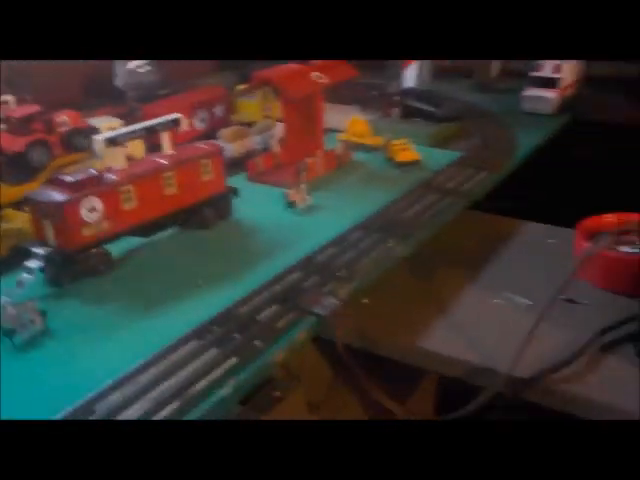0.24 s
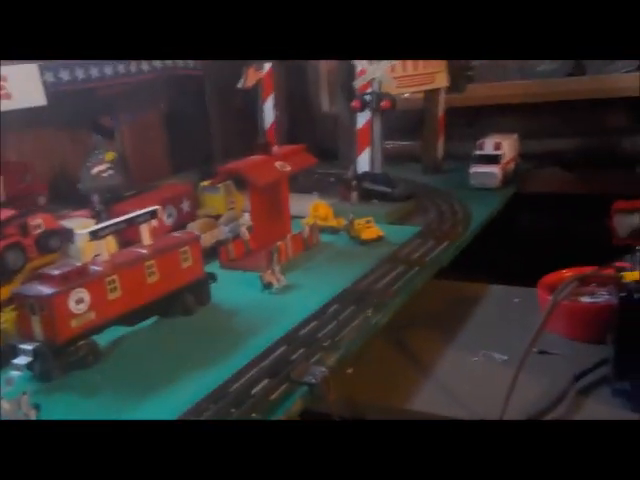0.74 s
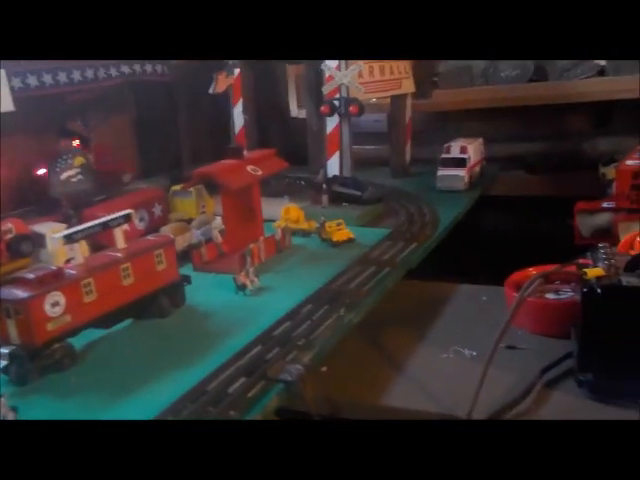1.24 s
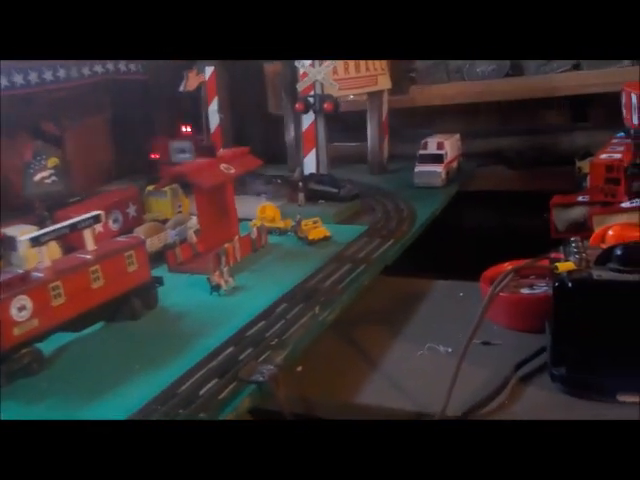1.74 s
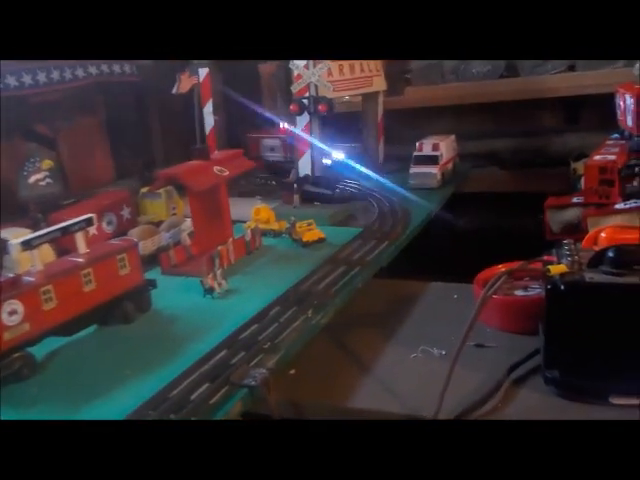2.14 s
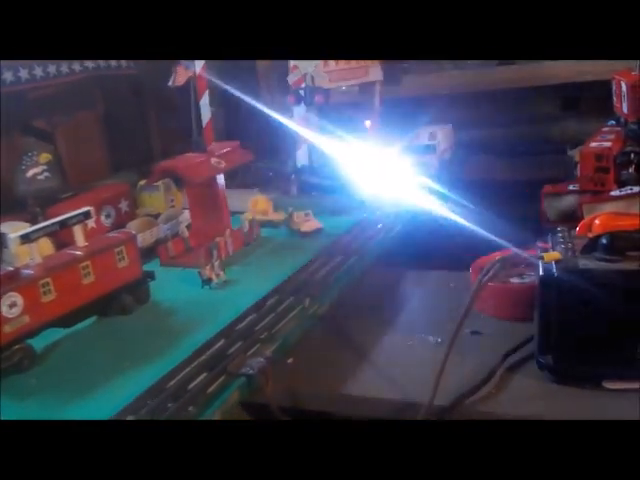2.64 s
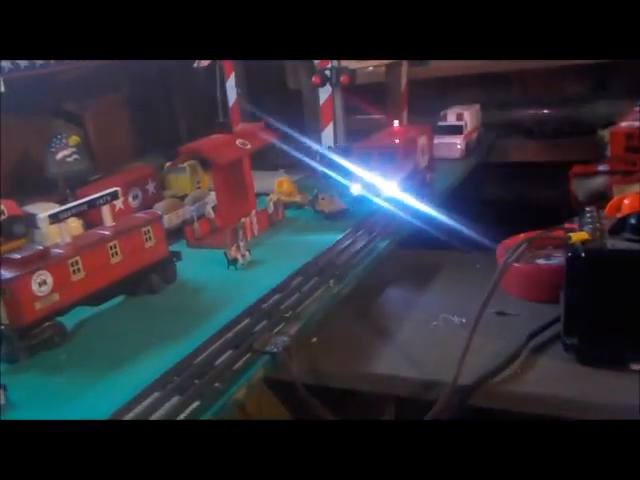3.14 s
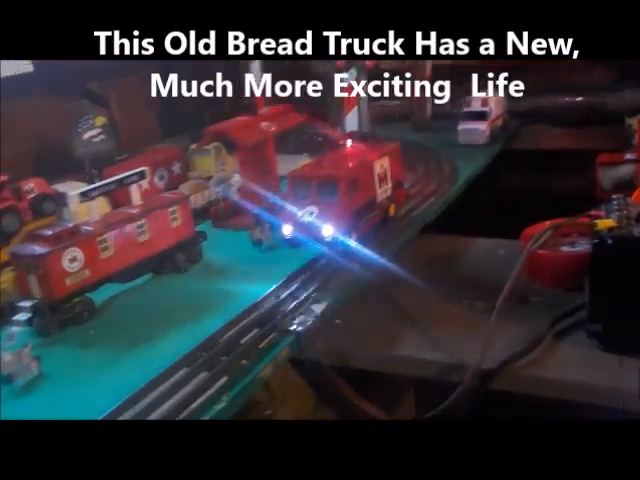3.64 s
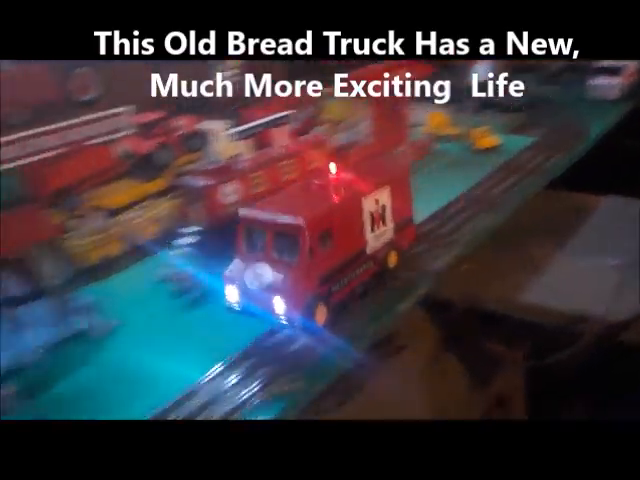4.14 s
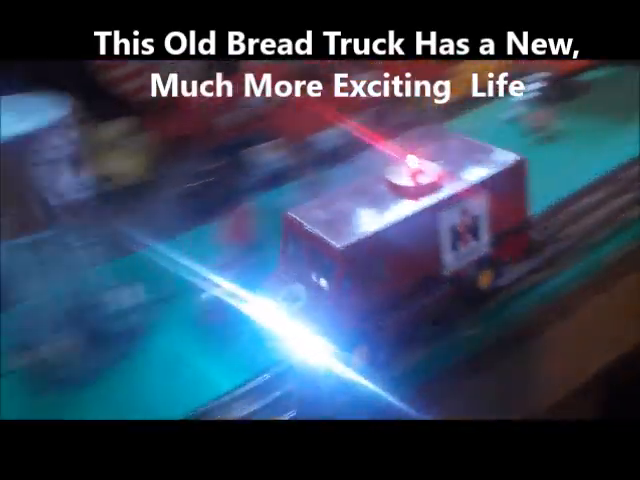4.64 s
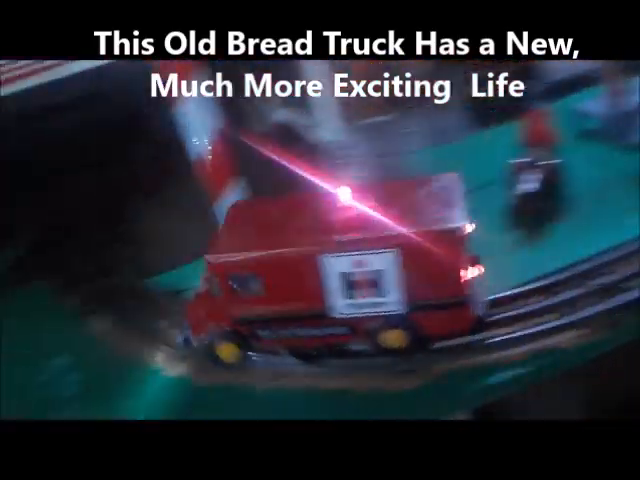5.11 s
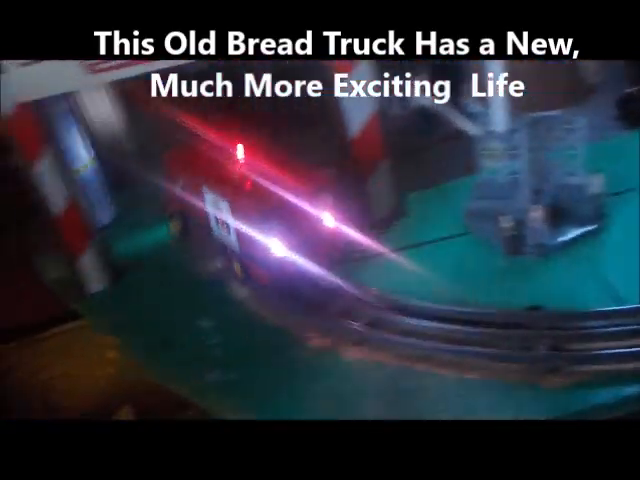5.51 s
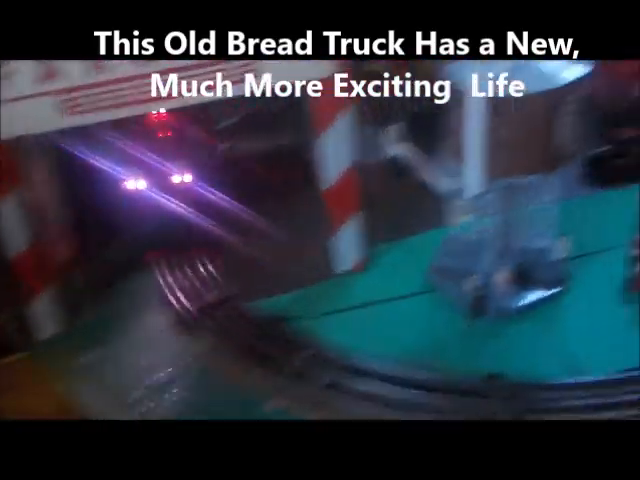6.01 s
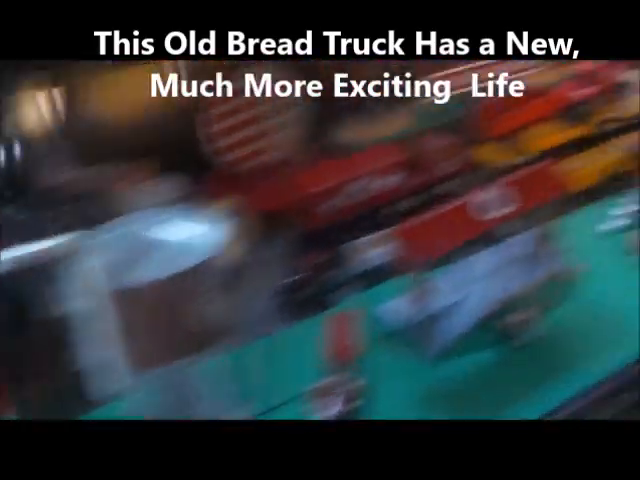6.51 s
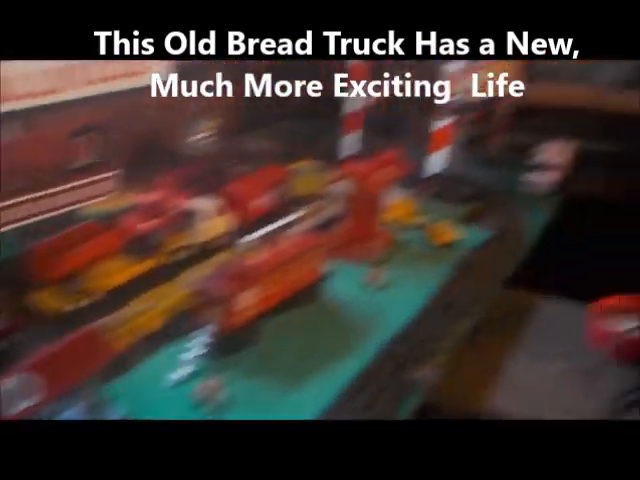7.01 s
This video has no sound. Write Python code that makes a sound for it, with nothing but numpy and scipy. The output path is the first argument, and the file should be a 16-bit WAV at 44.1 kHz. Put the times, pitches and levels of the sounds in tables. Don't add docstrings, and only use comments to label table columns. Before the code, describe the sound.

A toy truck runs round a track on a table, its wheels giving a steady bright rattle over a woody drumming. Paired clacks mark each rail joint, about two a second. It swells as it passes close around the middle, then recedes. Near three seconds the camera's plastic shell creaks loudly, close and to the right. Late on, a finger muffles the right side and a button clicks.

```python
import sys
import numpy as np
from scipy import signal
from scipy.fft import rfft, irfft, next_fast_len
from scipy.io import wavfile
from scipy.ndimage import uniform_filter1d, map_coordinates

SR = 44100
rng = np.random.default_rng(int(sys.argv[2]) if len(sys.argv) > 2 else 0)


def level_to_linear(level):
    exponent = np.asarray(level, float) / 20
    return 10 ** exponent


def store_pcm(level_fs):
    pcm = np.round(np.clip(level_fs, -1, 1) * 32767).astype(np.int16)
    wavfile.write(sys.argv[1], SR, np.atleast_2d(pcm).T)


N = 320166


def unit(x):
    return x / np.sqrt(np.mean(x ** 2) + 1e-20)


def along(points, hz):
    f, v = np.transpose(points)
    return np.interp(np.log(hz + 1), np.log(f + 1), v)


def curves(rows):
    s, *columns = np.transpose(rows)
    return [np.interp(np.arange(N) / SR, s, column) for column in columns]


def wobble(rate):
    knots = rng.standard_normal(int(N * rate / SR) + 4)
    return map_coordinates(knots, [np.arange(N) * rate / SR])


def filtered(x, response):
    m = next_fast_len(N + SR // 2)
    return irfft(rfft(x, m) * response(np.fft.rfftfreq(m, 1 / SR)), m)[..., :N]


def onset(t, rise_s):
    return 1 - np.exp(-t / rise_s)


def pan(db):
    return level_to_linear([[db / 2], [-db / 2]])


def place(out, s, sound):
    start = round(s * SR)
    out[..., start:start + sound.shape[-1]] += sound


def ring(modes, t, scatter_db):
    total = 0
    for hz, db, t60 in modes:
        decay = level_to_linear(db + scatter_db * rng.normal() - 60 * t / t60)
        total = total + decay * np.sin(2 * np.pi * hz * t)
    return total


# time in seconds, nearness as wheel rattle in dB, open line of sight in dB.
ROLL = [(0.0, -36, 4), (0.16, -32.5, -2), (0.6, -33.5, -8), (0.8, -35, -3), (1.5, -34.5, -1),
        (1.72, -32.5, 0), (2.14, -32.5, 5.5), (2.75, -32.5, -2.5), (3.09, -36, 1), (3.35, -41, 7),
        (3.84, -35, 12.5), (4.25, -30, 6.5), (4.85, -29.5, 5), (5.05, -26, 3.5), (5.74, -33.5, 2),
        (6.4, -34.5, 7), (6.67, -38.5, 7), (6.9, -36, 7)]
# frequency in Hz, density in dB per Hz.
TABLE_COLOUR = [(20, -70), (60, -42), (130, -69), (250, -28), (490, -11), (900, -1), (1400, 0),
                (1950, -0.5), (2300, -3.5), (2700, -20), (4000, -120)]
WHEEL_COLOUR = [(1500, -120), (2200, -37), (2750, -6), (3000, -14.5), (3190, -2), (3300, 3), (3510, 4),
                (3740, 0.5), (5150, -8.5), (7000, -23), (9100, -43.5), (15400, -120)]
SIZZLE_COLOUR = [(5000, -14), (6500, 0.5), (7600, -9), (8500, -10), (10000, -21), (12000, -37),
                 (15800, -41)]


def truck():
    wheel_db, sight_db = curves(ROLL)
    table_db = -38 + 0.48 * (wheel_db + 37.5)
    sizzle_db = wheel_db - 29 + sight_db
    clack, knock = rail_blows()
    zing = clack * level_to_linear(-35.5 + 0.72 * sight_db)
    shake = wobble(14)
    table = np.hypot(level_to_linear(table_db + 0.45 * shake + 0.17 * wobble(0.8)), level_to_linear(-11.5) * knock)
    wheels = np.hypot(level_to_linear(wheel_db + 1.0 * shake + 0.73 * wobble(30)), level_to_linear(-8) * clack)
    sizzle = np.hypot(level_to_linear(sizzle_db + 2.0 * shake), level_to_linear(7.0) * zing)
    sound = table * rattle(TABLE_COLOUR, knocks_db=2.5, patchy_db=1.2, ripple_db=2.3)
    sound += wheels * rattle(WHEEL_COLOUR, knocks_db=1.0, patchy_db=0.8, ripple_db=3.0)
    sound += sizzle * rattle(SIZZLE_COLOUR, knocks_db=3, patchy_db=1.1, ripple_db=1.5)
    return filtered(sound, lambda hz: (1j * hz / (120 + 1j * hz)) ** 2)


# front axle in seconds, rear axle in seconds, front peak in dB, rear peak in dB,
# knock into the table in dB relative to the peak.
JOINTS = [(0.21, 0.32, -30, -30, -4), (0.623, 0.7636, -20, -22.5, -0.5), (1.068, 1.206, -19.5, -25, -5.5),
          (1.575, 1.703, -17, -23.5, 0.5), (2.034, 2.1839, -21, -23, 2.5), (2.536, 2.683, -16, -21.5, -5.5),
          (3.094, 3.282, -26.5, -32, 2.5), (3.658, 3.805, -24, -23.5, 1), (4.098, 4.22, -22.5, -21.5, 0.5),
          (4.487, 4.587, -24, -16.5, -2.5), (4.849, 4.959, -19.5, -17.5, -2),
          (5.294, 5.413, -18.5, -19.5, 0), (5.843, 6.019, -21, -19.5, -7), (6.461, 6.644, -19, -23.5, -11)]
# time in
# seconds, peak in dB.
EXTRA_HITS = [(0.3865, -30), (0.4678, -27), (0.5247, -26), (1.036, -28), (1.65, -23), (1.694, -25.5),
              (1.8376, -28), (2.0956, -41), (2.2573, -41), (3.262, -29), (3.4655, -59), (4.467, -21.5),
              (4.6972, -47), (5.034, -42), (5.33, -28), (5.439, -28), (5.5214, -41), (5.5962, -37),
              (5.8306, -49), (0.5667, -27), (0.741, -26.5), (1.184, -24), (1.294, -31), (1.872, -30),
              (2.5855, -29), (2.6653, -18), (2.861, -28), (5.1535, -24), (5.682, -27), (5.942, -26),
              (6.488, -34), (6.622, -26)]


def rail_blows():
    clack, knock = np.zeros((2, N + SR))
    t = np.arange(SR // 3) / SR
    chatter_s, blow_s = 0.012, 0.0046

    def fade(t60):
        ring_out = level_to_linear(-60 * np.maximum(t - chatter_s, 0) / t60)
        return onset(t, 0.0005) * (ring_out + 0.5 * level_to_linear(-60 * t / blow_s))

    blows = [(s, db, 0.5) for s, db in EXTRA_HITS]
    for front, rear, front_db, rear_db, knock_db in JOINTS:
        blows += [(front, front_db, knock_db), (rear, rear_db, knock_db)]
    wheel_fade, table_fade = fade(t60=0.14), fade(t60=0.32)
    for s, db, knock_db in blows:
        place(clack, s, level_to_linear(db) * wheel_fade)
        place(knock, s, level_to_linear(db + knock_db) * table_fade)
    return clack[:N], knock[:N]


# frequency in Hz, left-right likeness from 0 to 1.
ALIKE = [(60, 1), (180, 0.35), (550, 0.98), (1650, 0.95), (4970, 0.7), (15000, 0.092)]


def rattle(spectrum, knocks_db, patchy_db, ripple_db):
    pair = rng.standard_normal((2, N)) * level_to_linear(knocks_db * wobble(400))
    for size, db, bins, frames in (512, patchy_db, 5, 10), (2048, ripple_db, 2, 8):
        z = signal.stft(pair, nperseg=size)[2]
        field = uniform_filter1d(rng.standard_normal(z.shape[1:]), bins, 0)
        field = uniform_filter1d(field, frames, 1)
        pair = signal.istft(z * level_to_linear(db * unit(field)), nperseg=size)[1][:, :N]

    def spread(hz):
        turn = np.arccos(np.clip(along(ALIKE, hz), -1, 1)) / 2
        return level_to_linear(along(spectrum, hz)) * [np.cos(turn), np.sin(turn)]

    mid, side = filtered(pair, spread)
    return unit(np.array([mid + side, mid - side]))


# time in seconds, peak in dB, thud into the table in dB relative.
STRIKES = [(0.3262, -23, -12), (0.623, -18, -10), (0.7422, -21, -10), (0.7622, -21, -7), (1.067, -22, -10),
           (1.1852, -23, -7), (1.2116, -18, -14), (1.5758, -16, -13), (1.6914, -24, -3), (1.709, -18, -8),
           (2.0384, -22, -5), (2.1839, -21, -12), (2.5376, -19, -11), (2.6823, -16, -13), (3.0904, -22, 3),
           (3.6581, -25, -7), (3.7963, -24, -8), (4.1036, -23, -9), (4.2224, -20, -13), (4.4832, -13, -16),
           (4.588, -17, -11), (4.6972, -23, -11), (4.8529, -18, -13), (4.999, -19, -12), (5.0704, -21, -13),
           (5.2959, -20, -8), (5.4134, -20, -7), (5.5214, -22, -9), (5.8306, -21, -13), (5.8471, -20, -13),
           (6.0242, -20, -11), (6.4627, -21, -12), (6.6444, -28, -11)]
# frequency in Hz, level in dB, t60 in seconds.
TREAD = [(3450, -3, 0.017), (3710, -0.5, 0.024), (4330, 0, 0.016), (4720, 2.5, .009), (5700, 7, 0.0043),
         (6700, -14, 0.0055), (8800, -22, .008), (10500, -34, .005)]
BOARD = [(780, -2, 0.021), (1080, -12, 0.014), (1440, 0, .022), (1740, 6, .018), (2000, -5, .015)]


def strikes():
    out, t = np.zeros(N + SR), np.arange(SR // 16) / SR
    for s, db, thud_db in STRIKES:
        warped = t * (1 + 0.05 * rng.normal())
        tread = level_to_linear(-6.5) * onset(t, 0.0004) * ring(TREAD, warped, scatter_db=3)
        board = level_to_linear(-8 + thud_db) * onset(t, 0.001) ** 2 * ring(BOARD, warped, scatter_db=3)
        place(out, s, level_to_linear(db) * (tread + board))
    return out[:N]


# middle in seconds, length in seconds,
# frequency in Hz, width in Hz, level in dB.
SINGING = [(0.371, 0.25, 3750, 225, -29), (0.525, 0.26, 1555, 251.4, -29), (.55, 0.26, 840, 40.2, -61),
           (1.608, 0.17, 430, 57, -44), (2.2, 0.43, 507, 40, -47), (2.58, 0.4, 733, 30.6, -38),
           (4.478, 0.13, 3820, 116.5, -25.5), (4.55, 0.19, 805, 87.5, -37.5),
           (4.747, 0.93, 921, 50.26, -39), (4.802, 0.82, 547, 50.9, -47.5), (5.35, 0.61, 822, 48.4, -41.5),
           (5.347, 0.2, 1400, 119, -35), (5.747, 0.33, 670, 49.5, -43), (6.113, 0.059, 942, 251, -34),
           (6.236, 0.058, 1004, 257, -32.5)]


def singing():
    out = np.zeros(N + SR)
    for s, length, hz, width_hz, db in SINGING:
        t = np.arange(round(length * SR)) / SR
        flutter = map_coordinates(rng.standard_normal(200), [t * width_hz * 2])
        swell = level_to_linear(db) * np.sin(np.pi * t / length)
        place(out, s - length / 2, swell * flutter * np.sin(2 * np.pi * hz * t))
    return out[:N]


# frequency in Hz, left over right in dB.
LEAN = [(60, 4), (180, -4), (550, -5), (1650, -4), (4970, -0.5), (15000, -1)]
# time in seconds, share covered from 0 to 1.
COVER = [
    (0, 0.06),
    (6.51, 0.1),
    (6.54, 0.33),
    (6.69, 0.76),
    (6.73, 1),
    (7.26, 1),
]
# frequency in Hz, gain in dB.
MUFFLE = [(200, 12), (450, -13), (1200, -20.5), (2000, -12.5), (2900, -50), (4300, -19.5), (5500, -20),
          (9000, -45)]


def ports(x, lag_s):
    left, right = filtered(x, lambda hz: level_to_linear(along(LEAN, hz) * np.array([[0.5], [-0.5]])))
    right = filtered(right, lambda hz: np.exp(-2j * np.pi * hz * lag_s))
    depth = curves(COVER)[0]
    covered = 0
    for share in (0, 0.5, 1):
        stage = filtered(right, lambda hz: level_to_linear(share * along(MUFFLE, hz)))
        covered = covered + np.clip(1 - abs(depth - share) / 0.5, 0, 1) * stage
    return np.array([left, covered])


# time in seconds, peak in dB, snap in dB relative, left over right in dB.
CREAKS = [(2.829, -14.5, -16, -14), (2.8488, -8, -25, -16), (2.92, -11.5, -18, -12),
          (2.9284, -5, -16, -16.5), (2.94, -10, -15, -13), (2.9489, -6.5, -14, -14),
          (2.9857, -5.5, -15, -11), (2.997, -6, -18, -15), (3.1082, -19, -10, -9),
          (3.1113, -4.5, -9.5, -18), (3.1162, -7, -19, -16), (3.1245, -19, -21, -6), (6.198, -10, 1, -8),
          (6.22, -20, -9, -6), (6.552, -28, 0, -18), (7.243, -22, -21, -1)]
# frequency in Hz, level in dB, t60 in seconds.
HOLLOW = [(833, -30, 0.091), (889, -15.5, 0.024), (1026, -10, 0.01), (455, -21.5, 0.02)]
SNAP = [(3840, 4, 0.0036), (5070, 8, 0.0021), (11600, -35, 0.002), (14800, -35, 0.002)]
WALL = [(1260, 1, 0.004), (1430, -6, 0.0084), (1750, -18, 0.019), (2030, -22, 0.046)]


def shell():
    out, t = np.zeros((2, N + SR)), np.arange(SR // 16) / SR
    rise = level_to_linear(2.5) * onset(t, 0.00043) ** 2
    for s, db, snap_db, pan_db in CREAKS:
        hollow = rise * ring(HOLLOW, t, scatter_db=1.5)
        snap = level_to_linear(snap_db) * onset(t, 0.0004) ** 2 * ring(SNAP, t, scatter_db=1.5)
        wall = rise * ring(WALL, t, scatter_db=1.5) + snap
        place(out, s, level_to_linear(db) * (hollow * pan(pan_db) + wall * pan(0.55 * pan_db)))
    return out[:, :N]


# time in seconds, peak in dB, left over right in dB.
BUTTON = (7.0512, -7, -5)
# frequency in Hz, level in dB, t60 in seconds.
CLICK = [(4650, 6.5, 0.0028), (3800, -10, 0.008), (4360, -11, 0.012), (6460, -14, 0.0037)]
TICK = [(9350, -19, 0.002), (11800, -10, 0.002), (14300, -11, 0.002)]
SEAT = [(880, -1, 0.031), (1240, -4, 0.024), (1564, -0.5, 0.037), (1672, -2, 0.037)]


def button():
    s, db, pan_db = BUTTON
    out, edge = np.zeros((2, N + SR))
    t = np.arange(SR // 16) / SR

    def past(when):
        return 1 / (1 + np.exp(np.clip((when - t) / 0.0003, -50, 50)))

    place(out, s, onset(t, 0.0004) ** 2 * level_to_linear(db + 9) * ring(CLICK, t, 0))
    place(edge, s, onset(t, 0.0003) ** 2 * level_to_linear(db + 9) * ring(TICK, t, 0))
    damped_db = 0
    held = level_to_linear(damped_db * past(0.0044)) * (1 - past(0.0076))
    place(out, s + 0.0005, onset(t, 0.00071) * level_to_linear(db - 3.0) * held * ring(SEAT, t, 0))
    left = np.roll(out + level_to_linear(-9) * edge, shift=2)
    return np.array([left[:N], (out + edge)[:N]]) * pan(pan_db)


# time in seconds, peak in dB, pitch in Hz, left over right in dB.
BUMPS = [(.08, -58, 120, 1), (.34, -51, 90, -1), (0.642, -48, 130, -5), (1.055, -51, 140, -3),
         (2.226, -42, 200, -4), (1.57, -63, 100, -4), (2.531, -51, 130, -4), (2.635, -32, 368, -14),
         (3.11, -29, 308, -13), (4.577, -50, 100, 2), (5.825, -38, 130, -3), (6.105, -40, 256, -9),
         (6.198, -38, 260, -11), (6.221, -49, 200, -4), (6.243, -47, 220, -4), (6.533, -26, 453, -25),
         (6.579, -43, 280, -18), (6.695, -36, 360, -14), (6.833, -41, 264, -15), (6.887, -37, 295, -16),
         (7.041, -51, 200, -14), (7.211, -48, 220, -11)]
# time in seconds, level in dB.
RUB = [(6.05, -68.5), (6.2, -43), (6.3, -63), (6.44, -62), (6.48, -59), (6.55, -47), (6.7, -47.5),
       (6.73, -97), (7.2, -90)]
# frequency in Hz, density in dB per Hz.
SKIN = [(60, -25), (300, -3), (600, 0), (1200, -8), (2400, -30), (4000, -28), (8000, -42), (15000, -44)]


def fingers():
    out, t = np.zeros((2, N + SR)), np.arange(SR // 8) / SR
    for s, db, hz, pan_db in BUMPS:
        decay = level_to_linear(-60 * t * hz / 3.5)
        push = onset(t, 0.0025) * decay * np.sin(2 * np.pi * hz * t)
        place(out, s, level_to_linear(db + 3.5) * push * pan(pan_db))
    grip = level_to_linear(2.5 * wobble(80))
    drag = unit(filtered(rng.standard_normal((2, N)) * grip, lambda hz: level_to_linear(along(SKIN, hz))))
    return out[:, :N] + level_to_linear(curves(RUB)[0]) * drag * level_to_linear([[-5.5], [3]])


# middle in seconds, length in seconds, level in dB, left over right in dB.
SCUFFS = [
    (2.685, .04, -54, -4),
    (3.111, 0.015, -52, -17),
    (6.1, .12, -60, 1),
    (6.203, 0.057, -56, 0),
    (6.482, 0.047, -54, -2),
    (6.56, 0.14, -61, 1),
    (6.65, 0.065, -66, -3),
]


def scuffs():
    swell = np.zeros((2, N))
    for s, length, db, pan_db in SCUFFS:
        bump = np.exp(-0.5 * ((np.arange(N) / SR - s) / (length / 3)) ** 2)
        swell += level_to_linear(db) * bump * pan(pan_db)
    grit = rng.standard_normal((2, N)) * level_to_linear(4.5 * wobble(260))
    return swell * unit(filtered(grit, lambda hz: 1 / (1 + (8500 / (hz + 1)) ** 6)))


# frequency in Hz, t60 in seconds.
ROOM = [(300, 1), (2000, 0.72), (10000, 0.07)]


def room(x):
    hz, t, z = signal.stft(rng.standard_normal((2, SR // 2)), SR, nperseg=256)
    decay = level_to_linear(-60 * t / along(ROOM, hz)[:, None])
    tail = signal.istft(z * decay, SR, nperseg=256)[1]
    return signal.fftconvolve(x, tail / np.linalg.norm(tail[0]), axes=1)[:, :N]


# frequency in Hz, density in dB per Hz.
HISS = [(30, 10), (90, 3.5), (300, -3), (3000, -23), (8000, -24), (9200, -4.5), (11700, -3.5), (15800, -2)]


def self_noise():
    shared, left, right = rng.standard_normal((3, N))
    pair = np.array([0.68 * shared + left, 0.77 * shared + right])
    return unit(filtered(pair, lambda hz: level_to_linear(along(HISS, hz))))


# frequency in Hz, width in Hz, depth in dB.
NOTCHES = [(2386, 1640, -23), (8060, 540, -10)]


def capsule(hz, low_hz, top_hz):
    response = (1j * hz / (low_hz + 1j * hz)) ** 2
    for centre_hz, width_hz, db in NOTCHES:
        gap = centre_hz ** 2 - hz ** 2
        response = response * (gap + 1j * hz * width_hz * level_to_linear(db)) / (gap + 1j * hz * width_hz)
    return response * (hz < top_hz)


def scene():
    creaks = shell()
    handling = creaks + level_to_linear(-27) * room(creaks) + button()
    handling = filtered(handling, lambda hz: (1j * hz / (550 + 1j * hz)) ** 2)
    track = ports(truck() + singing() + strikes(), lag_s=2.5e-5)
    return track + handling + fingers() + scuffs()


def low_pass(x):
    return signal.sosfilt(signal.butter(12, 16830, fs=SR, output="sos"), x)


def record(dry):
    noisy = dry + level_to_linear(-66.0) * self_noise()
    heard = filtered(noisy, lambda hz: capsule(hz, low_hz=200, top_hz=15800))
    return low_pass(heard)


dry = scene()
out = record(dry)
store_pcm(out)
```